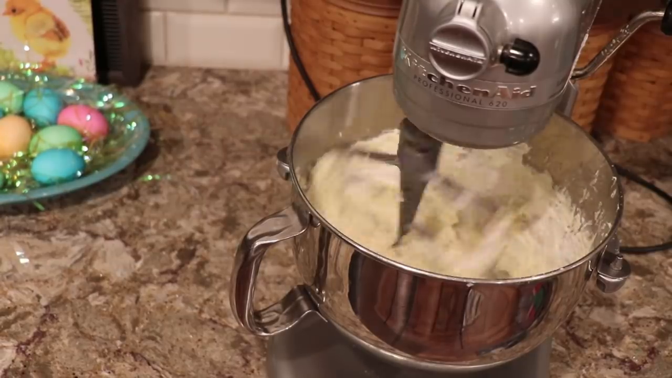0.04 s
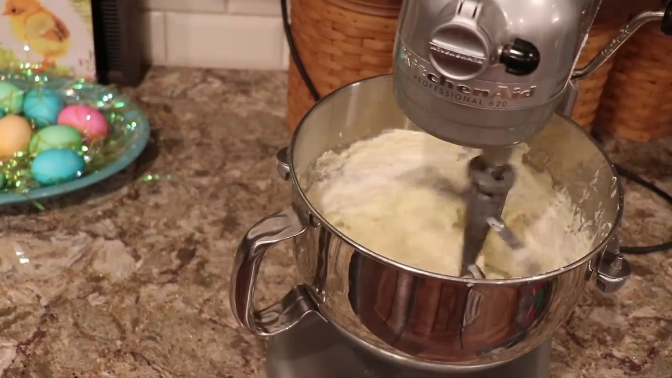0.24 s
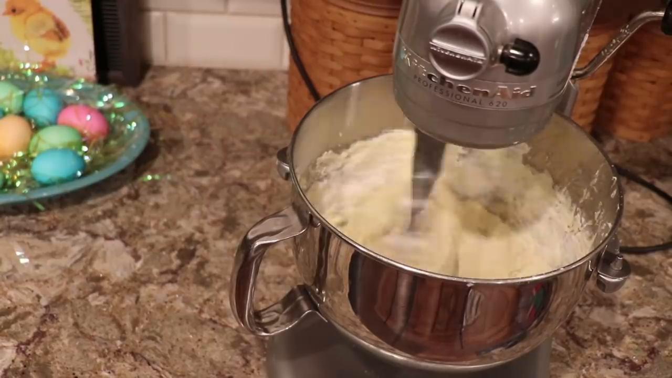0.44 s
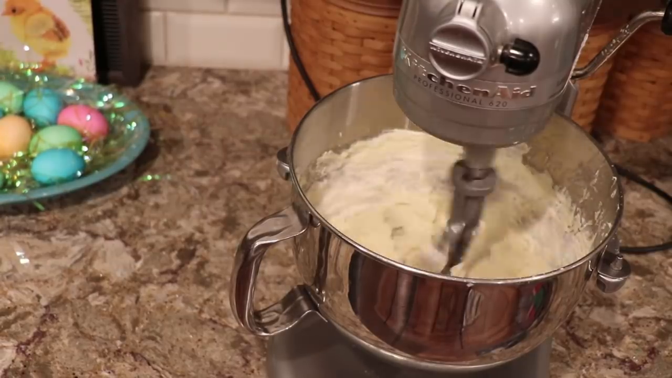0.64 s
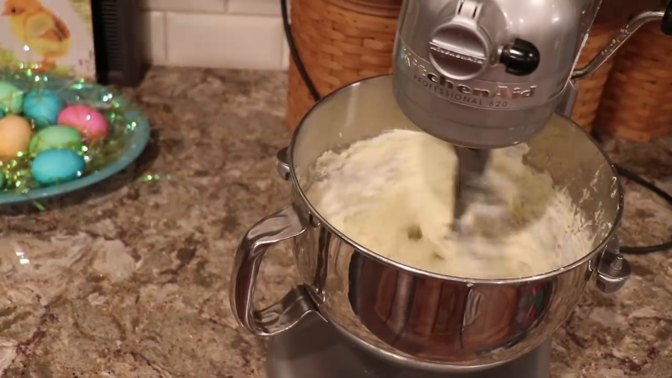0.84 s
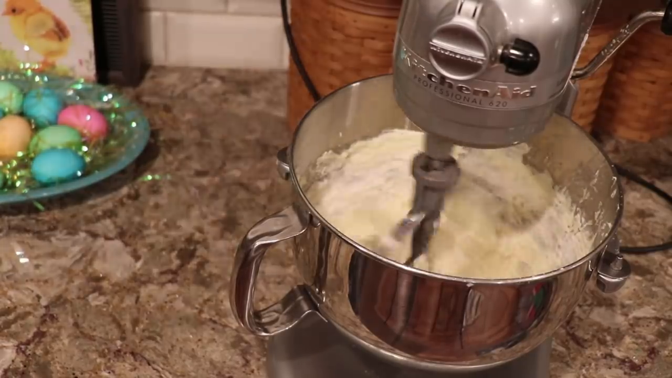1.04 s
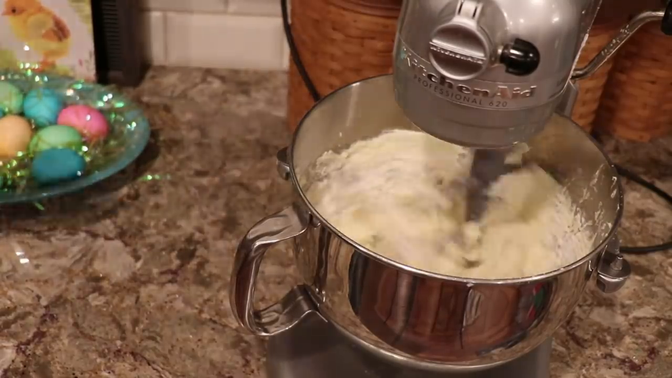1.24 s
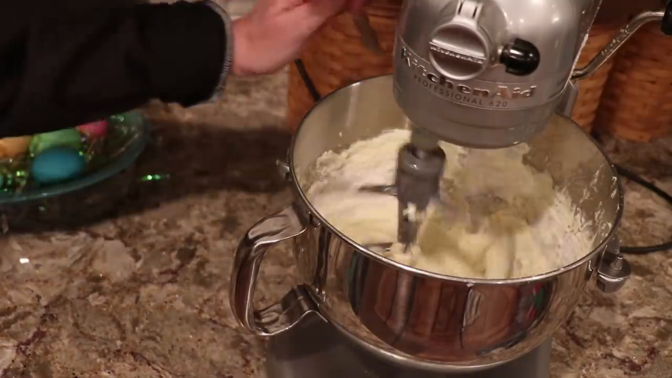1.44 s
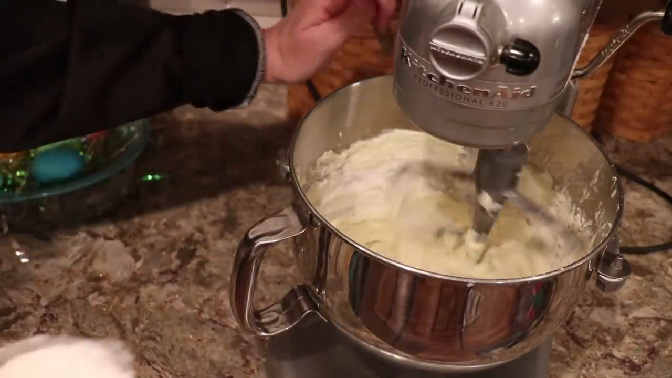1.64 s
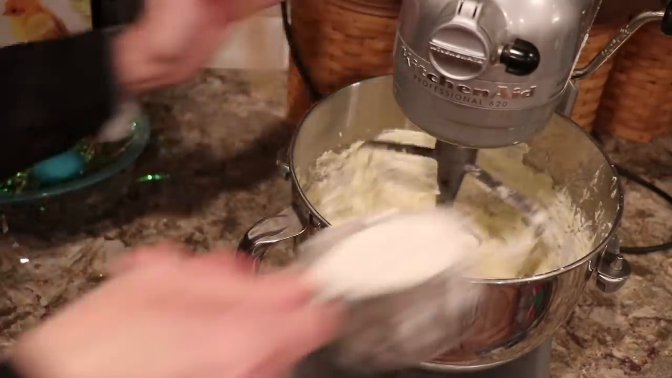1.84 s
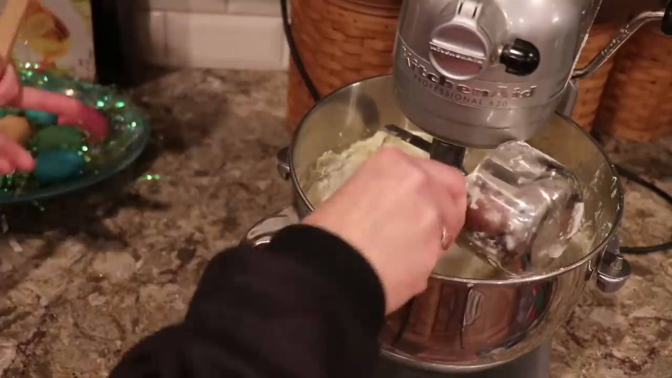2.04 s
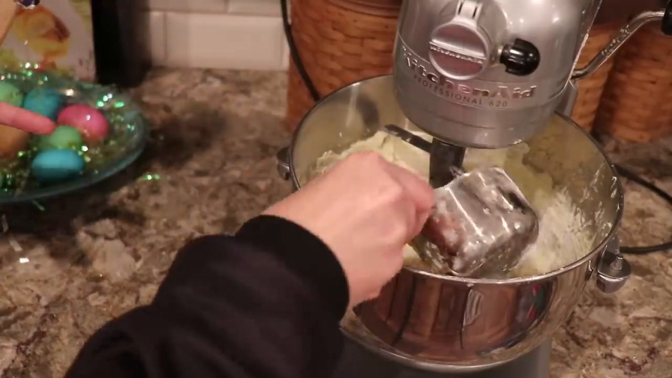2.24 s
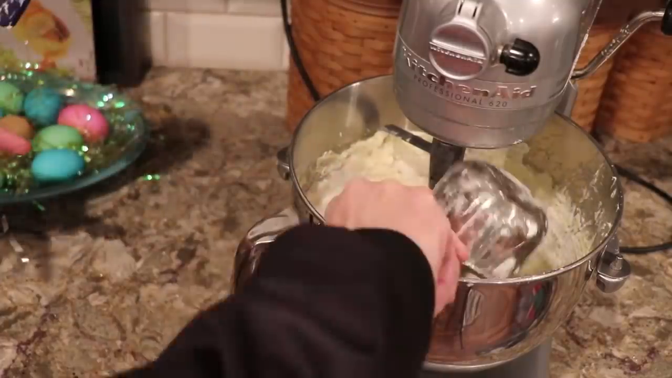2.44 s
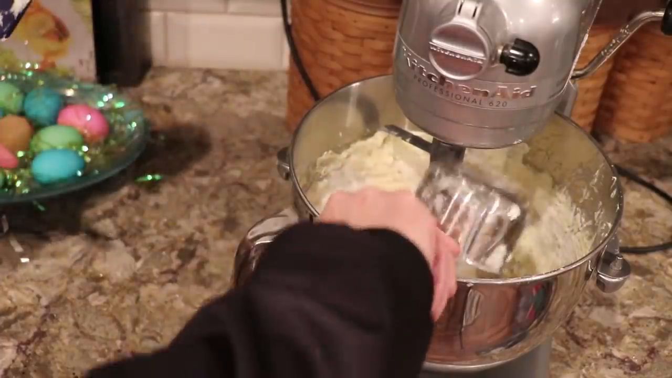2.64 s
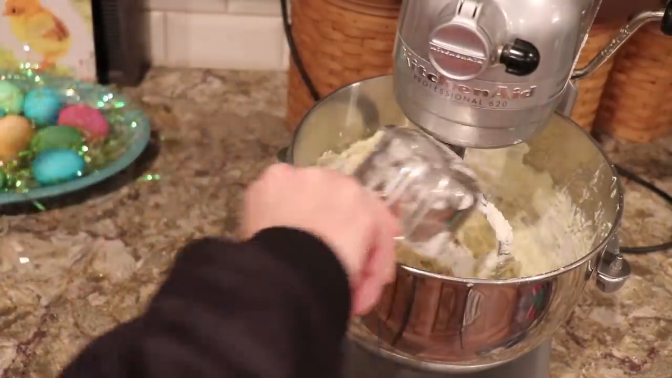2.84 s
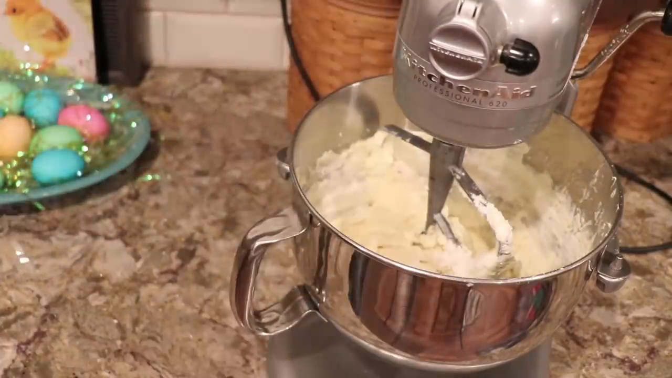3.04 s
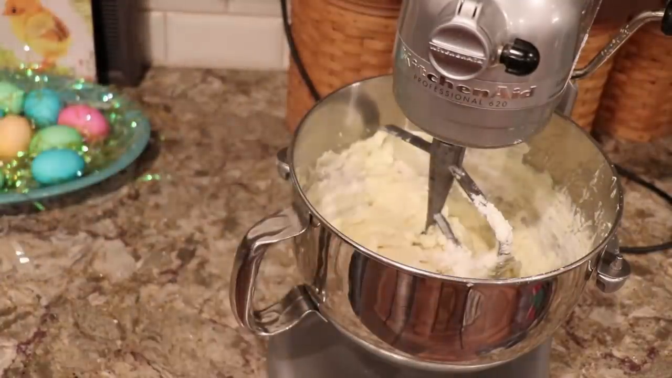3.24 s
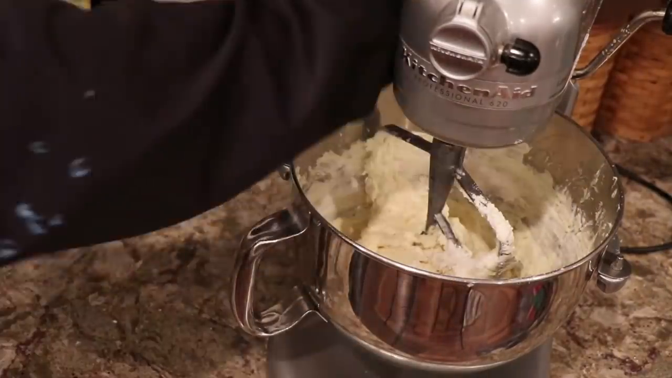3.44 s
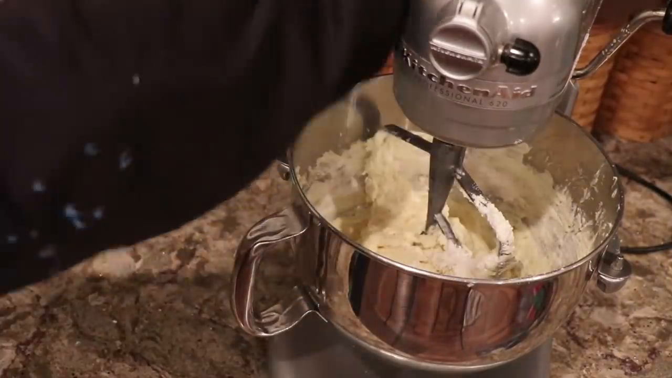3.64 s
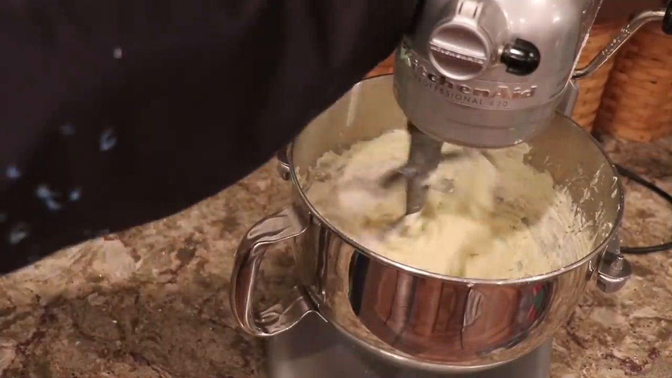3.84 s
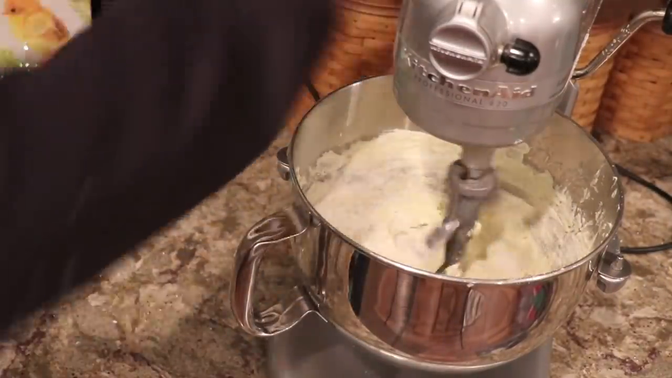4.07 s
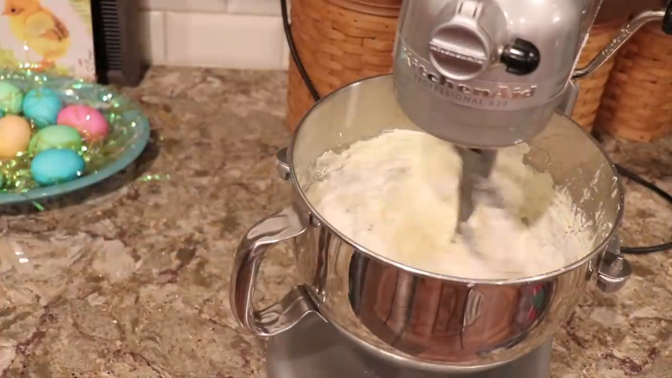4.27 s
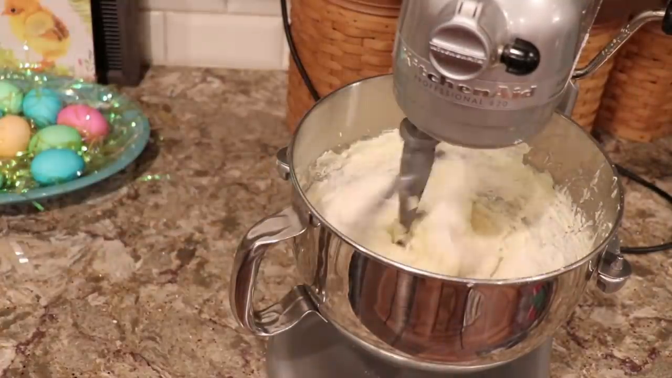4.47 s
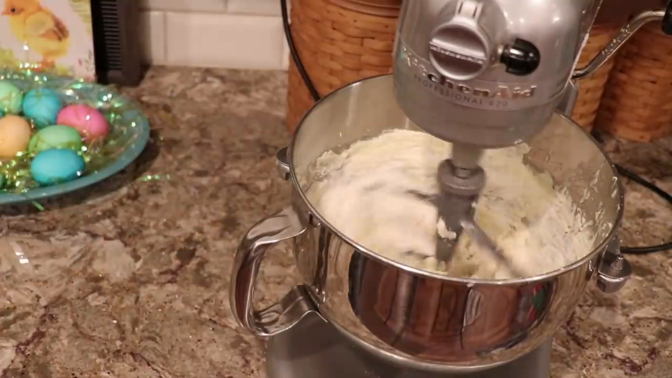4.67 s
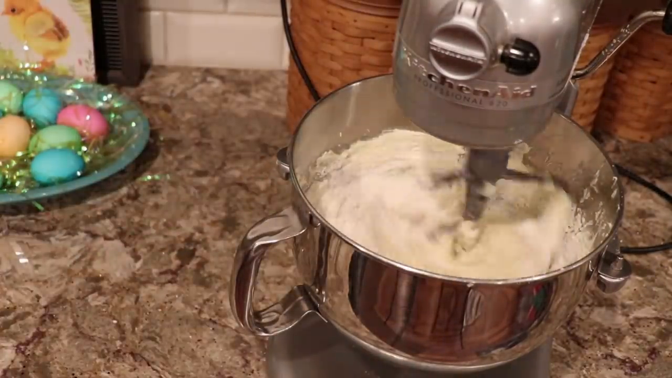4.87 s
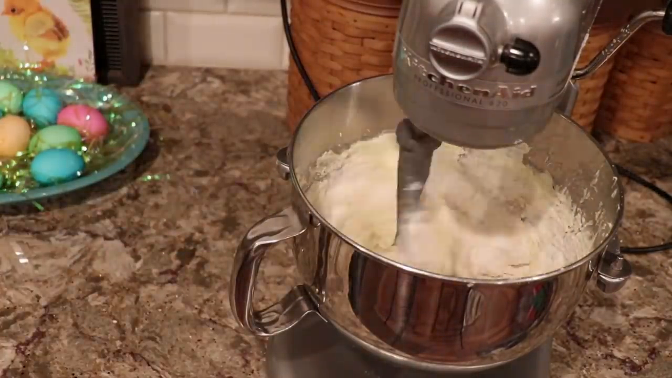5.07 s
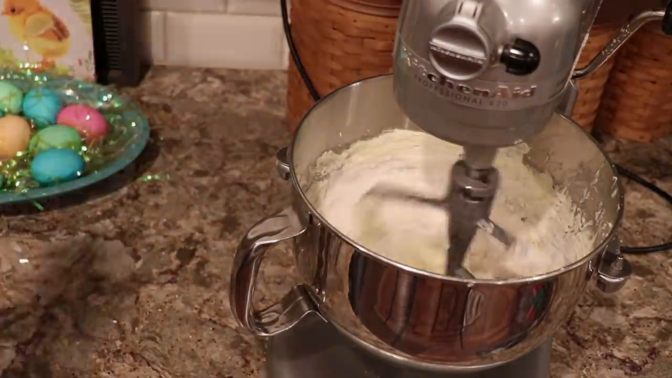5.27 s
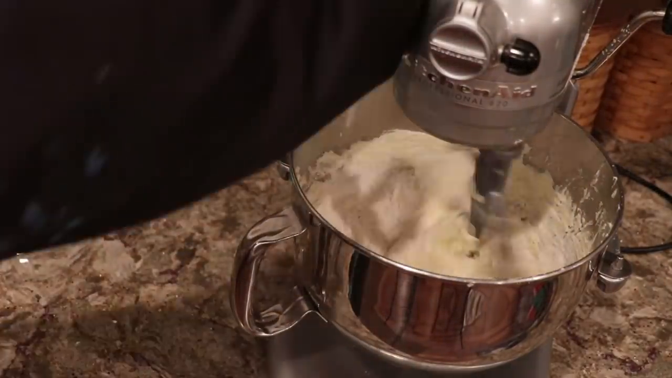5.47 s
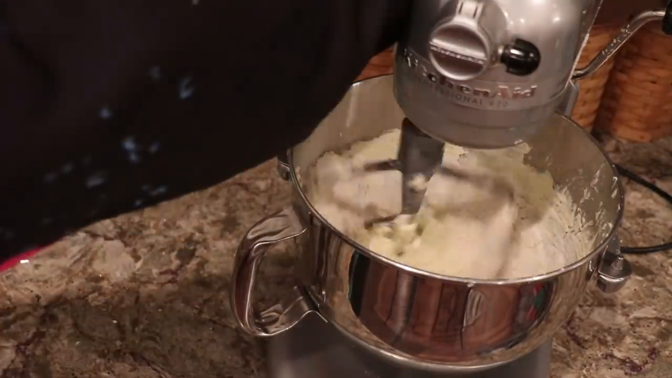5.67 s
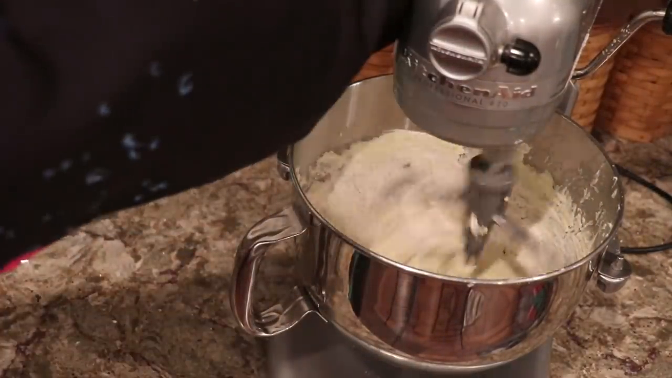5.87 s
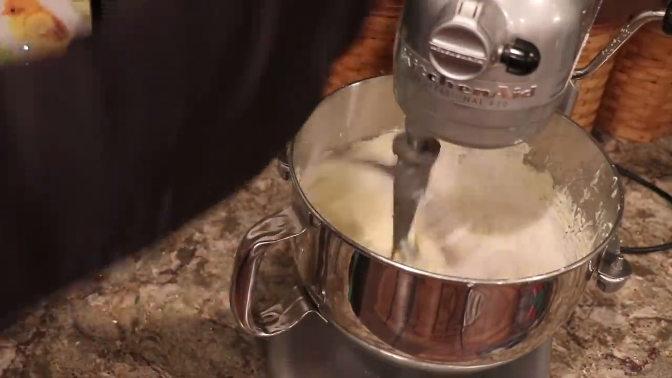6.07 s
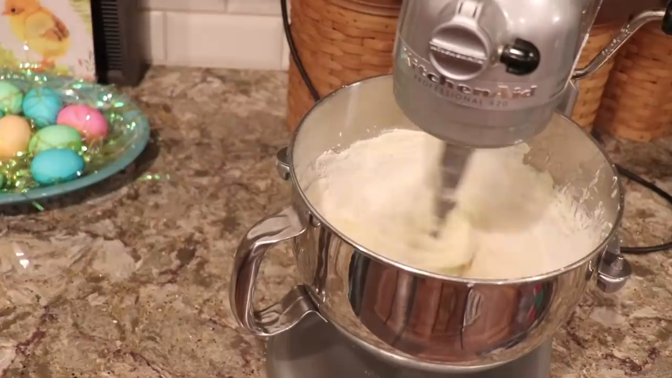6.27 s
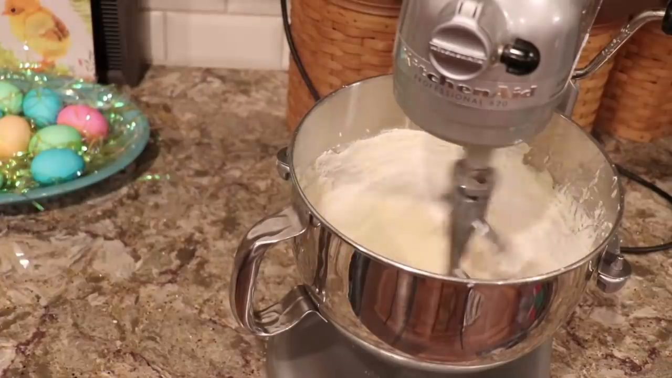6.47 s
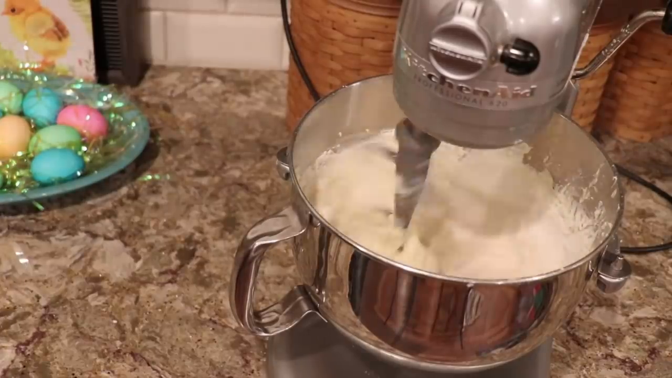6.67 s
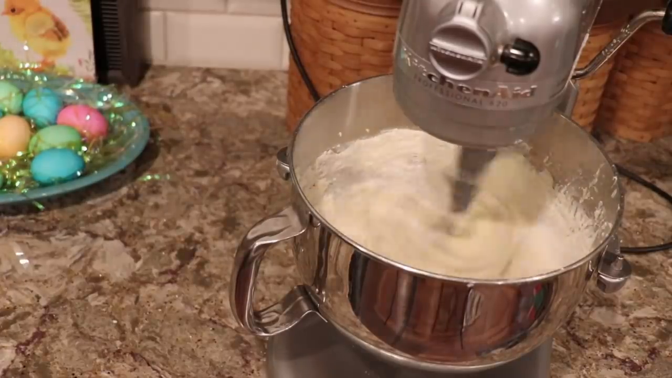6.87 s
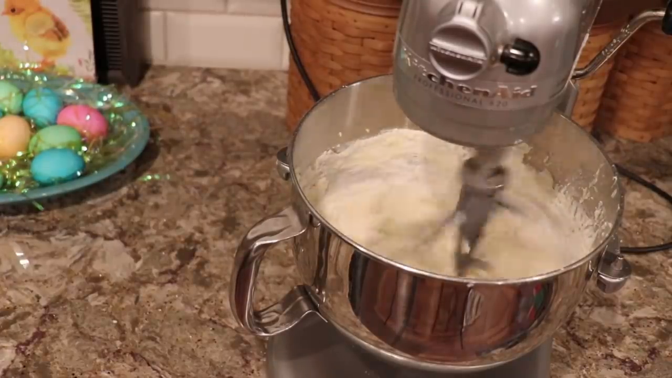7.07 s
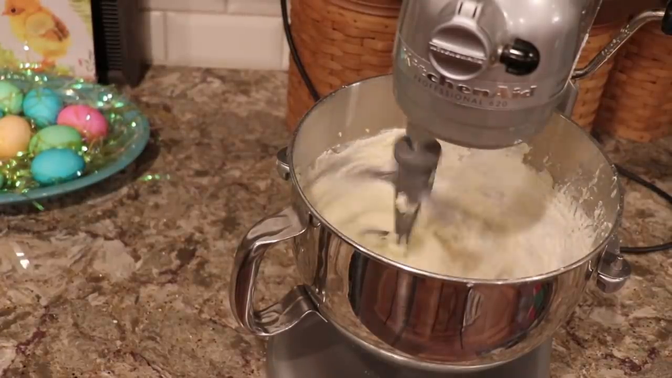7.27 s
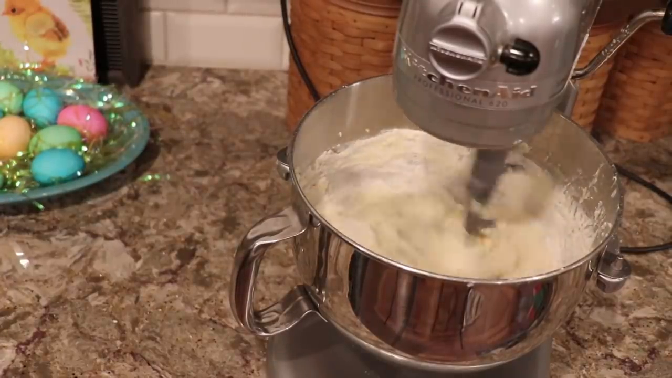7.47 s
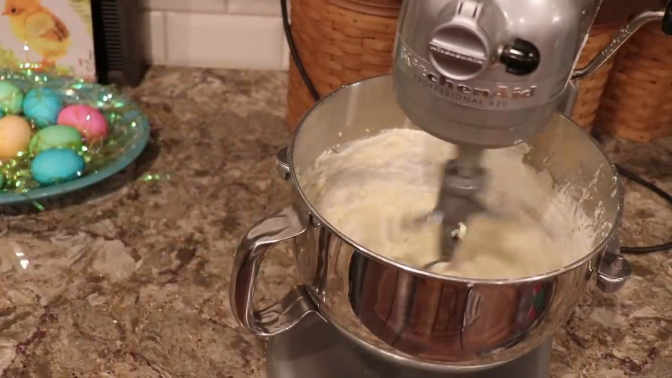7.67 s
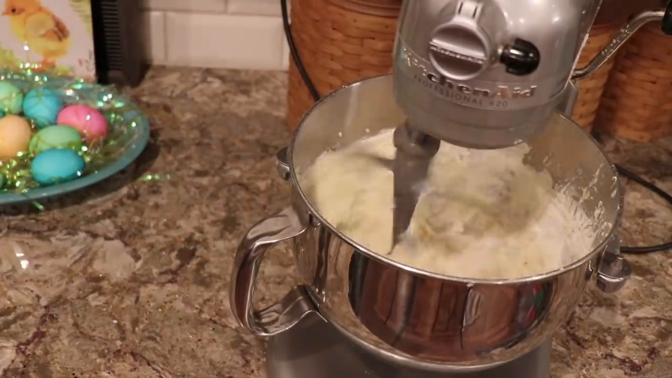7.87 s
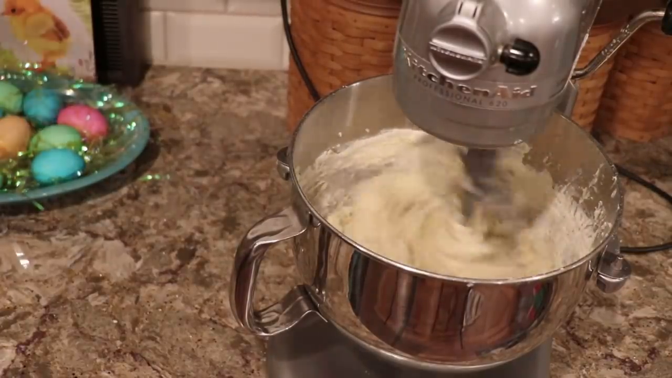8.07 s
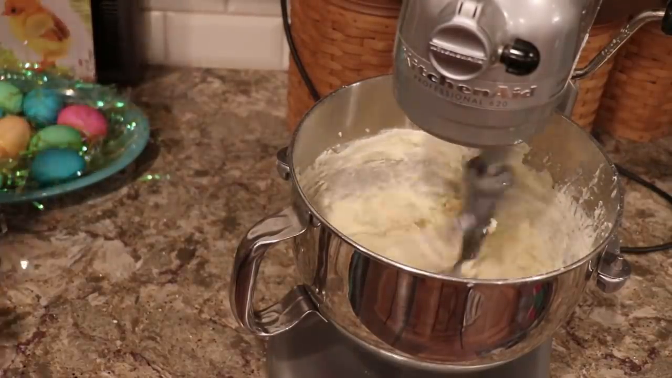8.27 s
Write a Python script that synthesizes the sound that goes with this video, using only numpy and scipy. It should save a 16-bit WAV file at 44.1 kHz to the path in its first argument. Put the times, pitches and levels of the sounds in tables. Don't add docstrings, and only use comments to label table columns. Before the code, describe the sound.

A stand mixer beats dough with a steady, rattling mid-pitched whine, then quickly winds down. In the humming kitchen, a metal cup knocks the steel bowl twice, lands on a stone counter, and thin glass clinks and rings. Cloth rustles and a lever ticks softly. The motor restarts lower, then jumps to a faster, higher whine until the end. Close stereo microphone, small hard-walled room.

```python
import sys
import numpy as np
from scipy import signal
from scipy.fft import rfft, irfft, next_fast_len
from scipy.io import wavfile
from scipy.ndimage import uniform_filter1d

SR = 44100
rng = np.random.default_rng(int(sys.argv[2]) if len(sys.argv) > 2 else 0)


def transcribe(u):
    v = np.clip(np.atleast_2d(u).T, -1, 1)
    q = np.round(v * 32767).astype(np.int16)
    wavfile.write(sys.argv[1], SR, q)


def level_to_linear(level):
    exponent = np.asarray(level, float) / 20
    return 10 ** exponent


N = 366458

TEETH = 60
POWER_OFF_S, RESTART_S, POWER_ON_S, TOP_SPEED_S = 1.69, 3.75, 3.759, 5.94
SHARP_RISE = 1050
STEP_HZ = [957, 1297, 1914]


def evened(x):
    return x / np.sqrt(np.mean(x ** 2) + 1e-20)


def read(points, hz):
    f, value = np.transpose(points)
    return np.interp(np.log(hz + 1), np.log(f + 1), value)


def held(t, rows, rise):
    levels = [db - rise * np.maximum(s - t, 0) - fade * np.maximum(t - s - hold, 0)
              for s, hold, db, fade in rows]
    return np.max(levels, axis=0)


def wander(size, hz):
    knots = rng.standard_normal(size // 256 + 2)
    knots = signal.lfilter([1], [1, -np.exp(-2 * np.pi * hz * 256 / SR)], knots)
    return np.interp(np.arange(size) / 256, np.arange(len(knots)), evened(knots))


# frequency in Hz, likeness of left and right from 0 to 1.
LIKENESS = [(60, 0.98), (180, 0.96), (620, 0.97), (1200, 0.82), (4970, 0.66), (15000, 0.32)]
# frequency in Hz, left over right in dB.
LEAN = [(60, -.5), (180, -1.5), (550, 0), (1650, -0.5), (4970, -3.5), (15000, -3.5)]


def noise(gain, size):
    padded = next_fast_len(size)
    hz = np.fft.rfftfreq(padded, 1 / SR)
    left, other = rfft(rng.standard_normal((2, padded)))
    same = np.clip(read(LIKENESS, hz), 0, 1)
    lean = level_to_linear(read(LEAN, hz) / 2)
    right = same * left + np.sqrt(1 - same ** 2) * other
    pair = np.array([left * lean, right / lean])
    return evened(irfft(pair * gain(hz), padded)[:, :size])


def tone(turns, hz, blur):
    apart = rng.normal(0, 1.0) * np.sqrt(1 - np.clip(read(LIKENESS, hz), 0, 1) ** 2)
    depth = 1 + 0.61 * blur * wander(len(turns), 9.9)
    phase = 2 * np.pi * (turns - np.floor(turns)) + 1.65 * blur * wander(len(turns), 15.0)
    phase = phase.astype(np.float32)
    lean = level_to_linear(read(LEAN, hz) / 2)
    pair = np.array([lean * np.cos(phase), np.cos(phase + np.float32(apart)) / lean])
    return np.sqrt(2) * depth * pair


# frequency in Hz, level in dB.
WHINES = [
    [(845.2, -54), (958.2, -43.5), (1034, -56.5), (1147, -49.5), (1798, -58), (1933, -54.5), (2180, -57),
     (2638, -61), (2880, -48), (3348, -62), (3973, -56), (4387, -58), (4802, -55.5), (5744, -55),
     (5938, -55), (8027, -65.5), (9173, -63), (10347, -72)],
    [(667.5, -64), (1001, -55), (1037, -58), (1297, -47), (1633, -55.5), (1922, -58), (2240, -56),
     (2310, -54.5), (2630, -49.5), (2920, -57), (3338, -54.5), (3920, -57), (4420, -65), (4690, -61.5),
     (5170, -55.5), (5900, -58), (7531, -58), (7800, -53.5), (960, -59.5), (1417, -63), (1560, -64),
     (9100, -59), (9360, -49.5), (10890, -58)],
    [(792, -63), (985.1, -51.5), (1283, -64), (1475, -62.5), (1636, -58.5), (1946, -49), (2110, -59),
     (2404, -47), (2720, -55), (2901, -42.5), (3381, -52.5), (3779, -55), (4300, -54), (4613, -64),
     (4790, -56.5), (5775, -53.5), (7220, -66.5), (9184, -58.5), (1916, -50)],
]
# frequency in Hz, width in Hz, level in dB.
SLOW_HOUSING = [(954, 22, 0.5), (1205, 38, -8), (1906, 63, -7.5), (2620, 34, -9), (2917, 47, -8),
                (3390, 56, -14.5), (3770, 91, -13), (4330, 130, -16.5), (4780, 29, -14.5),
                (5770, 52, -13.0), (8000, 33, -16), (9730, 130, -21.5), (10360, 75, -21), (1670, 61, -13.5),
                (2160, 120, -16.5), (2490, 55, -13.5), (5960, 130, -19.0), (14000, 1500, -25.0)]
# frequency in Hz, width in Hz, level in dB.
MID_HOUSING = [(996, 31, -18.5), (1298, 16.5, -2.5), (1655, 37, -4.5), (2600, 75, 0), (2896, 60, -3.5),
               (3380, 47, -13), (3950, 140, -9.5), (4324, 72, -7.0), (5240, 36, -14), (5900, 130, -10.5),
               (6480, 120, -10.0), (7780, 21, -18), (9350, 30, -9.5), (10900, 86, -12), (1960, 60, -14),
               (1150, 67, -10), (1810, 90, -12), (2050, 80, -16), (2517, 60, -7.5), (3760, 80, -14),
               (14000, 670, -12), (15550, 300, -16)]
# frequency in Hz, width in Hz, level in dB.
FAST_HOUSING = [(1190, 18, -20), (1927, 35, 2.5), (2430, 62, -1.5), (2910, 44, -0.5), (3370, 56, -2.0),
                (3770, 56, -8.5), (4325, 100, -7.5), (4920, 47, -22), (5740, 35, -7.0), (9700, 250, -28),
                (2220, 70, -12.5), (3240, 80, -16), (4380, 50, -12), (1840, 36, -8.0), (2620, 150, -10.5),
                (3970, 160, -10.0), (5940, 160, -12.5), (14350, 2500, -23.0)]
HOUSING = [SLOW_HOUSING, MID_HOUSING, FAST_HOUSING]
# frequency in Hz, level in dB per Hz.
RATTLE = [
    [(120, -72), (200, -34.5), (293, -34), (757, -19), (959, 0), (1190, -13.5), (1380, -19), (1880, -12.5),
     (2920, -9.5), (3190, -12.5), (5230, -19.5), (5830, -11), (6200, -20), (15600, -26)],
    [(120, -55), (200, -37), (535, -26), (977, -3.5), (1090, -8), (1280, -9), (1510, -14), (2570, -2),
     (3560, -10), (7660, -13.5), (8550, -16), (9360, -10.5), (11400, -16), (15600, -12)],
    [(120, -73), (200, -38.5), (704, -22), (977, -8.5), (1380, -17), (1920, -2.5), (2100, -3), (2920, -8),
     (3080, -6), (3310, -6), (5230, -13.5), (5940, -10), (6300, -12), (7600, -15.5), (8800, -20.5),
     (15600, -24.5)],
]
RATTLE_DB = [-7.5, -7, -10]


def housing_rattle(k, size):
    top_hz = max(WHINES[k], key=lambda line: line[1])[0]

    def colour(hz):
        locked = 1 - .6 * np.exp(-((hz - top_hz) / 45) ** 2)
        peaks = sum(level_to_linear(db) ** 2 / (1 + (2 * (hz - f) / width) ** 2) ** 1.49
                    for f, width, db in HOUSING[k])
        return locked * np.sqrt(peaks + level_to_linear(read(RATTLE[k], hz) + RATTLE_DB[k]) ** 2)

    return noise(colour, size)


# whine against rattle in dB, blur of the whine from 0 to 1.
STEPS = [
    (6.5, 0.13),
    (4, 0.16),
    (4.5, 0.17),
]


def gear_whine(k, tooth_hz, shaft):
    whine_db, blur = STEPS[k]
    top_db = max(db for _, db in WHINES[k])
    tuned = np.exp(-((tooth_hz / STEP_HZ[k] - 1) / 0.053) ** 2)
    sway_turns = .0006 * (1 + 0.38 * wander(len(shaft), 2.9))
    rocked = shaft + sway_turns * np.sin(2 * np.pi * shaft / 3)
    pulse = 1 + 0.3 * np.cos(2 * np.pi * shaft / 3)
    sound = np.zeros((2, len(shaft)))
    for hz, db in WHINES[k]:
        commutator = hz > 7000
        waver = 0.22 if commutator else blur * (hz / 2500) ** 0.4 * (1 + (top_db - db) / 11)
        partial = tone(hz / STEP_HZ[k] * TEETH * rocked + rng.random(), hz, waver)
        sound += level_to_linear(db + 33 + whine_db) * tuned * partial * (pulse if commutator else 1)
    return sound


# frequency in Hz, depth from 0 to 1, phase in turns.
THROB = [
    [(850, .3, .27), (940, .44, .02), (1150, .15, .1), (1930, .25, .41), (2880, .22, -.03),
     (5750, .13, -.19), (13000, .09, -.04)],
    [(1000, .05, .3), (1300, .65, 0), (1631, .3, -.28), (2600, .4, -.52), (2920, .2, 0), (7790, .08, .5),
     (13000, .02, .6)],
    [(985, .1, .5), (1920, .34, -.02), (2406, .33, .04), (2902, .38, -.07), (3381, .28, -.09),
     (3779, .2, .31), (4323, .45, .07), (5782, .3, -.13), (13000, .09, -.07)],
]


def throbbing(k, sound, shaft):
    size = next_fast_len(len(shaft))
    hz, bins = np.fft.rfftfreq(size, 1 / SR), rfft(sound, size)
    at_hz, depth, phase = np.transpose(THROB[k])
    swing = np.interp(hz, at_hz, depth) * np.exp(2j * np.pi * np.interp(hz, at_hz, phase))
    ahead = irfft(bins * swing.real, size)[:, :len(shaft)]
    aside = irfft(bins * swing.imag, size)[:, :len(shaft)]
    sound = sound + ahead * np.cos(2 * np.pi * shaft) - aside * np.sin(2 * np.pi * shaft)
    sound *= 1 + 0.033 * np.cos(2 * np.pi * 6 * shaft)
    return sound * (1 + .12 * np.cos(2 * np.pi * (.104 * shaft - .12)))


def gear_step(k, tooth_hz, shaft):
    sound = housing_rattle(k, len(shaft)) + gear_whine(k, tooth_hz, shaft)
    sound = throbbing(k, sound, shaft)
    treble = signal.sosfiltfilt(signal.butter(4, 6500, "high", fs=SR, output="sos"), sound)
    return evened(sound - treble), evened(treble)


# start in seconds, gear level in dB, drift under load in dB per second,
# brush hiss against the gears in dB.
LEVER = [
    (0, -32, -.4, -3),
    (3.75, -32.5, -4, -5),
    (5.82, -33.5, -2, -2.5),
    (5.92, -31, .8, -5),
]


def effort(t, tooth_hz):
    row = np.searchsorted([row[0] for row in LEVER], t, "right") - 1
    at, level_db, drift, hiss_db = np.array(LEVER)[row].T
    level_db = uniform_filter1d(level_db + drift * (t - at), size=1300)
    hiss_db = uniform_filter1d(hiss_db - drift * (t - at), size=1300)
    coasting = (t > POWER_OFF_S) & (t < RESTART_S)
    full_hz = np.where(coasting, STEP_HZ[1], STEP_HZ[0])
    under = np.maximum(np.log2(full_hz / tooth_hz), 0)
    stall_db = 11 * np.maximum(np.log2(520 / tooth_hz), 0)
    level_db -= np.where(coasting, 9 * under + stall_db, 7.5 * under)
    hiss_db -= np.where(coasting, 4, 19) * under
    jolt_db = 6.5 * np.exp(-abs(t - TOP_SPEED_S) / np.where(t < TOP_SPEED_S, 0.032, .015))
    bite = np.where(t >= RESTART_S, np.clip((t - POWER_ON_S) / .01, 0, 1) ** 2, 1)
    return bite * level_to_linear(level_db + jolt_db), hiss_db - .5 * jolt_db


# start in seconds, hold in seconds, level in dB,
# fade in dB per second.
GLIDE = [
    (1.706, .03, -36.5, 250),
    (1.78, .015, -40.5, 700),
    (3.878, .04, -44.5, 350),
    (5.82, .095, -41.5, 500),
    (5.923, 0.039, -33.5, 160),
]
# start in seconds, hold in seconds, level in dB,
# fade in dB per second.
FLARE = [
    (5.84, .045, -39, 600),
]


def glide_tones(t, tooth_hz, shaft):
    second = level_to_linear(-3) * np.clip(tooth_hz / 900 - 1.2, 0, 1) * tone(2 * TEETH * shaft, 2000, .3)
    teeth = tone(TEETH * shaft, 1000, .12) + second
    commutator = tone(6 * TEETH * shaft, 7800, .05)
    return level_to_linear(held(t, GLIDE, SHARP_RISE)) * teeth + level_to_linear(held(t, FLARE, SHARP_RISE)) * commutator


# time in seconds, tooth contact rate in Hz.
SPEED = [(0, 1297), (1.69, 1297), (1.72, 1180), (1.76, 980), (1.8, 830), (2, 300), (3.75, 500), (3.88, 830),
         (3.93, 930), (4, 957), (5.815, 957), (5.835, 1335), (5.893, 1295), (5.922, 1860), (6, 1895),
         (6.1, 1914), (8.31, 1914)]


def motor(start, end):
    t = np.arange(round(start * SR), min(round(end * SR), N)) / SR
    tooth_hz = np.interp(t, *np.transpose(SPEED))
    gear, hiss_db = effort(t, tooth_hz)
    shaft = np.cumsum(tooth_hz) / SR / TEETH + .0014 * wander(len(t), 4)
    out = glide_tones(t, tooth_hz, shaft)
    step_hz = np.maximum(tooth_hz, 1150) if end < POWER_ON_S else tooth_hz
    for k in range(len(STEPS)):
        share = np.sqrt(np.interp(step_hz, STEP_HZ, np.arange(len(STEPS)) == k))
        if not share.any():
            continue
        active = np.flatnonzero(share)
        on = slice(active[0], active[-1] + 1)
        gears, brushes = gear_step(k, tooth_hz[on], shaft[on])
        crawl = np.clip(1 - tooth_hz[on] / 900, 0, 1)
        if crawl.any():
            dull = signal.sosfilt(signal.butter(2, 1500, fs=SR, output="sos"), gears)
            gears += 1.03 * crawl * (1.4 * dull - gears)
        out[:, on] += (share * gear)[on] * (gears + level_to_linear(hiss_db[on]) * brushes)
    return out


# start of the motor run in seconds, end in seconds.
RUNS = [
    (0, 2.0),
    (3.75, 8.31),
]


def mixer():
    out = np.zeros((2, N))
    for start, end in RUNS:
        sound = motor(start, end)
        first = round(start * SR)
        out[:, first:first + sound.shape[1]] = sound
    return out


# frequency in Hz, level in dB per Hz.
AIR_COLOUR = [(18, -75), (30, -57), (111, -15), (230, -25), (299, -13), (442, -12), (604, -7), (764, 0),
              (918, 1.5), (1190, -1), (1390, -4.5), (2120, -7.5), (2350, -10.5), (11900, -30.5),
              (15400, -30)]


def kitchen_air():
    return level_to_linear(-54) * noise(lambda hz: level_to_linear(read(AIR_COLOUR, hz)), N)


# frequency in Hz, level with motor off in dB, level with motor on in dB,
# rise while accelerating in dB.
HUM = [(368.4, -76, -74.5, 0), (411, -79, -80.5, 2), (508, -72.5, -72, 3), (602, -65.5, -60.5, 12.5),
       (697, -68, -66.5, -2), (900, -63.5, -54.5, 10), (2100, -68, -69, 0), (1199, -64, -47, 2.5)]
# start in seconds, hold in seconds, level in dB, fade in dB per second.
SURGE = [
    (3.777, 0.14, -1.5, 500),
    (5.848, .09, -6, 500),
]


def mains_hum():
    t = np.arange(N) / SR
    running = np.clip(np.maximum((POWER_OFF_S - t) / .06 + 1, (t - POWER_ON_S) / .02), 0, 1)
    surge = level_to_linear(held(t, SURGE, SHARP_RISE))
    hum = np.zeros((2, N))
    for hz, off_db, on_db, surge_db in HUM:
        level_db = off_db + (on_db - off_db) * running + surge_db * surge
        level_db -= 3.5 * (hz < 1000) * (t > TOP_SPEED_S)
        hum += level_to_linear(level_db) * tone(hz * t, hz, 0.16)
    return hum


# full level reached in seconds, hold in seconds, level in dB, fade in dB per second.
COMPRESSOR = [
    (.62, 5.1, -63, 17),
]


def refrigerator():
    t = np.arange(N) / SR
    level_db = np.maximum(held(t, COMPRESSOR, 17), -83)
    return level_to_linear(level_db - 6.5) * tone(300.4 * t, 300.4, 0.087)


def knocks(events, body, crack_s, ring_db, rise_s=0.00029):
    colour, modes = body
    out, t = np.zeros((2, N)), np.arange(SR // 4) / SR
    for s, db, bright_db, long in events:
        crack = noise(lambda hz: level_to_linear(read(colour, hz) + bright_db * np.log2((hz + 50) / 1500)), len(t))
        crack *= np.exp(-t / (crack_s * long))
        ring = np.zeros(len(t))
        for f, mode_db, t60 in modes:
            level_db = mode_db + bright_db * np.log2(f / 1500) + rng.normal(0, 1.3)
            decay = level_to_linear(level_db - 60 * t / (t60 * long))
            ring += decay * np.sin(2 * np.pi * f * rng.uniform(1.0, 1.01) * t)
        hit = (crack + level_to_linear(ring_db) * ring) * np.minimum(t / rise_s, 1)
        out[:, round(s * SR):][:, :len(t)] += level_to_linear(db) * hit / abs(hit).max()
    return out


# start in seconds, peak in dB, brightness in dB per octave, decay factor.
CUP_KNOCKS = [
    (2.015, -17, -9.5, 1.1),
    (2.076, -9.5, 0.5, .95),
]
# start in seconds, peak in dB.
TICKS = [
    (2.348, -42),
    (2.3575, -38),
    (2.364, -43),
    (2.398, -44),
    (2.4054, -41),
    (2.416, -43),
    (2.928, -48),
    (3.129, -46),
    (3.187, -49),
]
# crack rows of frequency in Hz, level in dB per Hz; then mode rows of frequency in Hz,
# level in dB, t60 in seconds.
CUP = [(180, -61), (300, -41), (494, -36), (1030, 1), (1430, -17), (2060, -6.5), (4000, -11), (4650, -22),
       (5050, -16), (7780, -30), (14400, -41), (15900, -41)], [(1024, 2.5, 0.053), (843, -10, 0.06),
       (1170, -7.5, 0.068), (1904, -7, 0.08), (2450, -8, 0.099), (3270, -19, .07), (3920, -8, 0.066),
       (5000, -18, 0.096)]


def cup():
    ticks = [(*tick, 3, 2.2) for tick in TICKS]
    return knocks(CUP_KNOCKS, CUP, 0.004, -9) + knocks(ticks, CUP, 0.0037, -29, rise_s=.002)


# start in seconds, peak in dB, brightness in dB per octave, decay factor.
NUDGES = [(2.11, -41, 4, 1.4), (2.135, -41, 6, 1.5), (2.165, -37, 9, 1.5), (2.179, -30, 3, 1.8),
          (2.193, -30, 2, 1.8), (2.207, -35, 3, 1.5), (2.504, -37.5, -1, 1), (2.547, -39, -2, 1.4),
          (2.601, -32.5, -3, 1), (2.666, -44, 0, 1), (2.773, -46, 0, 1)]
# crack rows of frequency in Hz, level in dB per Hz; then mode rows of frequency in Hz,
# level in dB, t60 in seconds.
NUDGE_BODY = [(400, -40), (800, -12), (1050, 0), (1300, -9), (1600, -28), (2500, -20), (4000, -29),
              (15900, -70)], [(1033, 2, .07), (1186, -3, .07), (1310, -6, .06), (907, -6, .08),
              (2450, -16, .06)]


def nudges():
    return knocks(NUDGES, NUDGE_BODY, .006, -4, rise_s=.0008)


# start in seconds, peak in dB, brightness in dB per octave, decay factor.
RIM_KNOCKS = [
    (2.224, -17.5, -1.1, 1.3),
    (2.242, -8, 1, 0.93),
    (2.255, -29, 1, .8),
]
# frequency in Hz, level in dB per Hz.
RIM_COLOUR = [(300, -45), (600, -28), (1030, 2), (1450, -23), (2000, -2.5), (3300, -8), (4300, -20),
              (5000, -15), (7780, -33.5), (15900, -43)]
# frequency in Hz, level in dB, t60 in seconds.
RIM_MODES = [(910, -8, 0.063), (1024, -3.5, 0.054), (1180, -7, .05), (1782, -11, .05), (2010, 0, .06),
             (2240, -9, .05), (2460, -4, .045), (3009, -6, .05), (3900, -15, .045), (4953, -9, .06),
             (5432, -22, .06)]


def rim_knocks():
    return knocks(RIM_KNOCKS, (RIM_COLOUR, RIM_MODES), 0.0038, -13)


# loudest moment in seconds, hold in seconds, level in dB, fade in dB per second.
RUSTLE = [
    (2.23, .1, -55, 45),
    (3.36, 0.25, -56, 65),
]
# frequency in Hz, level in dB per Hz.
RUSTLE_COLOUR = [(410, -50), (700, -13), (886, 8), (2040, -14), (2590, -12), (3580, -13), (5450, -18),
                 (7070, -25), (15900, -25)]


def rustle():
    t = np.arange(N) / SR
    flicker_db = 3.5 * np.clip(wander(N, 40), -2, 1.6)
    level = level_to_linear(held(t, RUSTLE, 32) + flicker_db)
    return level * noise(lambda hz: level_to_linear(read(RUSTLE_COLOUR, hz)), N)


# start in seconds, peak in dB, brightness in dB per octave, decay factor.
SET_DOWN = [
    (2.826, -14, 0, 0.94),
]
# crack rows of frequency in Hz, level in dB per Hz; then mode rows of frequency in Hz,
# level in dB, t60 in seconds.
COUNTER = [(180, -45), (300, -18), (898, -13.5), (1030, -1.5), (1530, -7), (3280, -5.5), (4890, -10.5),
           (8180, -33), (9190, -24), (10200, -39), (15900, -45)], [(1040, -4, .08), (2100, -10, 0.14),
           (3316, -14, .1), (4800, -19, 0.1), (8900, -14, 0.15), (9539, -21, .13)]


def set_down():
    return knocks(SET_DOWN, COUNTER, 0.0028, -13)


# start in seconds, peak in dB, brightness in dB per octave, decay factor.
CLINK = [
    (3.277, -16.5, 0, 1),
    (3.283, -11, 0, 1.2),
]
# crack rows of frequency in Hz, level in dB per Hz; then mode rows of frequency in Hz,
# level in dB, t60 in seconds.
GLASS = [(88, -65), (150, -25), (422, -23), (700, -10), (980, -2), (1230, -10), (1820, -9.5), (2800, -7.5),
         (3900, -4.5), (4930, -19), (7570, -20), (15900, -36)], [(963, -11, .1), (2680, -13, .09),
         (3910, -9, 0.08)]


def clink():
    return knocks(CLINK, GLASS, 0.0072, -6)


# frequency in Hz, level in dB, t60 in seconds.
GLASS_RING = [
    (4856, -46, 0.21),
    (6056, -38, 0.32),
    (7036, -66, .45),
    (3978, -50, .2),
]


def glass_ring():
    t, out = np.arange(SR // 2) / SR, np.zeros((2, N))
    ring = sum(level_to_linear(db - 60 * t / t60) * tone(hz * t, hz, .05) for hz, db, t60 in GLASS_RING)
    swell = np.minimum(t / 0.094, 1) ** 1.5
    out[:, round(CLINK[1][0] * SR):][:, :len(t)] = ring * level_to_linear(14.5) * swell
    return out


# start in seconds, peak in dB.
LEVER_TICKS = [
    (3.4494, -44),
    (3.478, -42.5),
    (3.558, -46),
    (3.568, -39.5),
    (3.632, -47),
]
# crack rows of frequency in Hz, level in dB per Hz; then mode rows of frequency in Hz,
# level in dB, t60 in seconds.
LEVER_BODY = [
    [(400, -40), (1500, -10), (3000, -2), (4000, -5), (6000, -8), (8700, -10), (15900, -24)],
    [(3030, 0, .06), (3950, -2, .05), (6040, -5, .05), (8660, -8, .04)],
]


def lever_ticks():
    return knocks([(*tick, 0, 1) for tick in LEVER_TICKS], LEVER_BODY, .004, -6, rise_s=.001)


# start in seconds, peak in dB.
SLACK = [
    (3.768, -30),
    (3.78, -29),
    (3.791, -31),
    (3.813, -32),
    (3.836, -25),
    (3.882, -25),
    (5.896, -27),
    (5.91, -27),
]
# frequency in Hz, level in dB, t60 in seconds.
HEAD_MODES = [(822, -2.5, .1), (1192, -1, 0.092), (2580, -3, .1), (3790, -6, 0.09)]


def gear_slack():
    return knocks([(*bite, 0, 1) for bite in SLACK], (CUP[0], HEAD_MODES), 0.01, 2)


# frequency in Hz, t60 in seconds.
ROOM = [(300, 0.21), (1000, 0.3), (3000, 0.27), (8000, 0.18), (16000, 0.34)]


def room(x):
    hz, t, z = signal.stft(noise(np.ones_like, SR // 2), SR, nperseg=256)
    decay_db = -60 * t / read(ROOM, hz)[:, None] - 7 * np.clip((t - .062) / 0.013, 0, 1)
    tail = signal.istft(z * level_to_linear(decay_db), SR, nperseg=256)[1]
    tail[:, :200] = 0
    return signal.fftconvolve(x, tail / np.linalg.norm(tail[0]), axes=1)[:, :N]


def scene():
    solid = cup() + nudges() + rim_knocks() + set_down() + lever_ticks() + gear_slack()
    hits = signal.sosfilt(signal.butter(3, 520, "high", fs=SR, output="sos"), solid)
    hits += signal.sosfilt(signal.butter(2, 220, "high", fs=SR, output="sos"), clink())
    kitchen = kitchen_air() + mains_hum() + refrigerator()
    return mixer() + kitchen + hits + level_to_linear(-9) * room(hits) + rustle() + glass_ring()


def band_limit(x):
    return signal.sosfilt(signal.butter(12, 16960, fs=SR, output="sos"), x)


def record(dry):
    late = np.array([np.roll(dry[0], 1), dry[1]])
    lowpass = signal.firwin(2047, 15740, window=("kaiser", 9), fs=SR)
    limited = signal.oaconvolve(late, lowpass[None], "same")
    return band_limit(limited)


dry = scene()
out = record(dry)
transcribe(out)
```